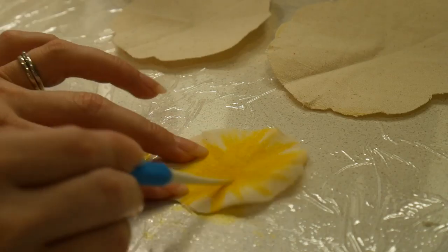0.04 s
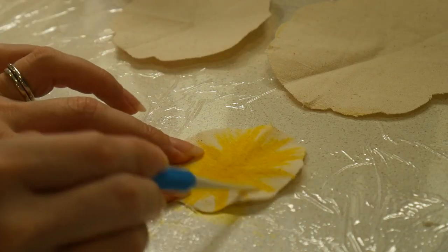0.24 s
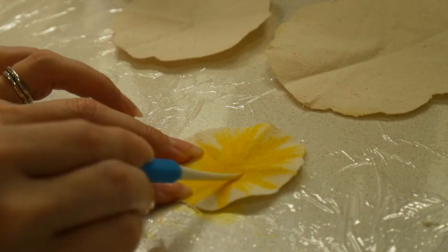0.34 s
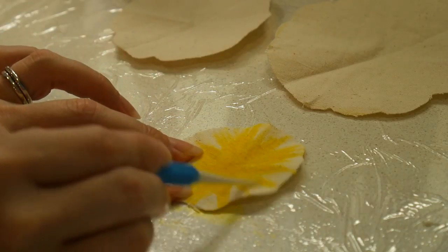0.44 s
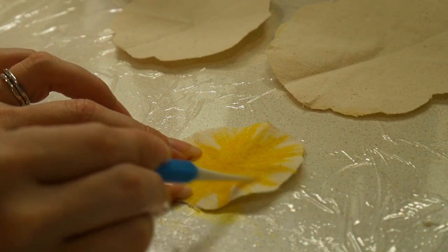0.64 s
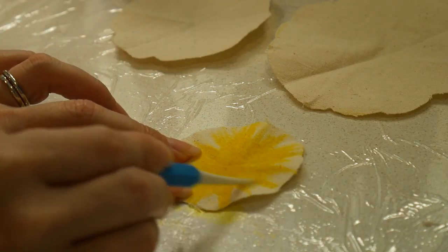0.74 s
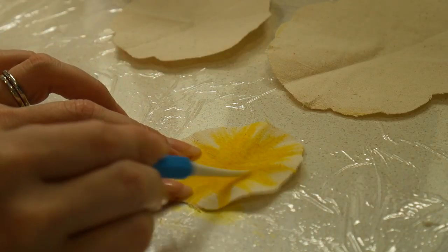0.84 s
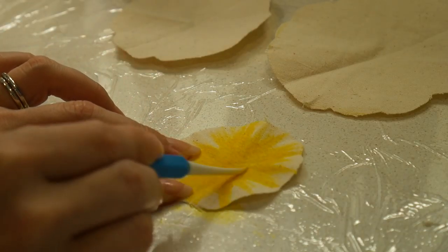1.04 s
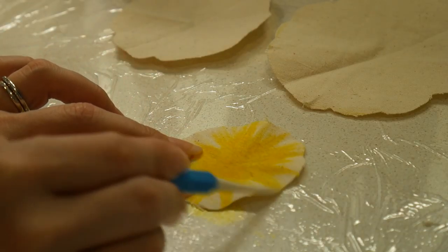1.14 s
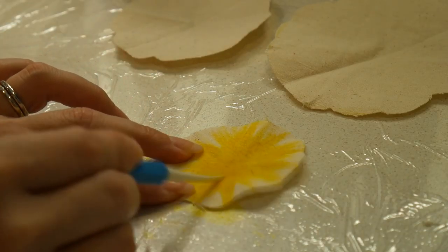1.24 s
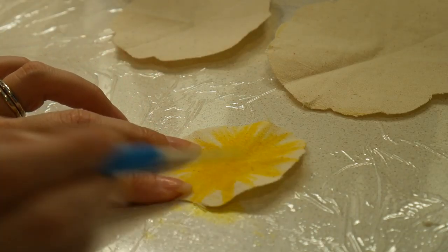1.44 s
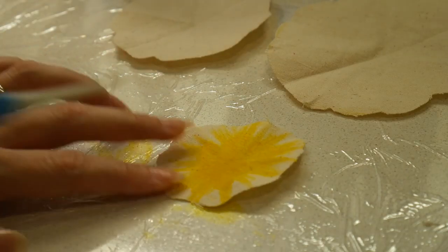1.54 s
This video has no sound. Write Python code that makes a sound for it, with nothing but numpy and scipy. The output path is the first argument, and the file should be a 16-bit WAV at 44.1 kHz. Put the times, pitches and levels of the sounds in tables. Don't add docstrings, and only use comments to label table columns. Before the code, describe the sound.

Short scratchy strokes of a small plastic tool on damp fabric, seven in an even rhythm, with clicky landings, faint film crackles and soft hand knocks, then a light tap; close stereo microphone in a quiet, humming room.

```python
import sys
import numpy as np
from scipy import signal
from scipy.fft import rfft, irfft
from scipy.io import wavfile
from scipy.ndimage import uniform_filter1d

SR = 44100
rng = np.random.default_rng(int(sys.argv[2]) if len(sys.argv) > 2 else 0)


def gain_from_db(level_db):
    decades = np.asarray(level_db, float) / 20
    return 10 ** decades


def dump_mix(stems):
    frames = np.atleast_2d(stems).T
    limited = np.clip(frames, -1, 1)
    pcm = np.round(limited * 32767).astype(np.int16)
    wavfile.write(sys.argv[1], SR, pcm)


N = 70560

CATCHES_S = [.2336, .4404, .6164, .8104, .9914, 1.1679, 1.3578]


def rms_one(x):
    return x / np.sqrt(np.mean(x ** 2) + 1e-20)


def resonance(x, hz, width_hz):
    r = np.exp(-np.pi * width_hz / SR)
    gain = (1 - r * r) / 2
    poles = [1, -2 * r * np.cos(2 * np.pi * hz / SR), r * r]
    return signal.lfilter([gain, 0, -gain], poles, x + 1e-18)


def drift(rate_hz):
    r = np.exp(-2 * np.pi * rate_hz / SR)
    settle = SR // 2
    slow = signal.lfilter([1], [1, -2 * r, r * r], rng.standard_normal(N + settle))[settle:]
    return slow / slow.std()


def burst(start_s, decay_s):
    t = np.arange(N) / SR - start_s
    return (t >= 0) * np.exp(-np.clip(t, 0, 1) / decay_s) * rng.standard_normal(N)


def bell(middle_s, half_width_s):
    t = np.arange(N) / SR
    return np.exp(-((t - middle_s) / half_width_s) ** 2)


def pair(mid, side, wider_db):
    # freq_hz, side_level_db
    pair_width = np.array([(100, -5), (400, -4), (1200, -12), (2600, -12), (4400, -17), (6500, -24),
                           (9000, -12), (13000, -7)])
    hz = np.fft.rfftfreq(N, 1 / SR) + 1
    side_db = wider_db + np.interp(np.log(hz), np.log(pair_width[:, 0]), pair_width[:, 1])
    side = irfft(rfft(side) * gain_from_db(side_db), N)
    return np.array([mid + side, mid - side])


def room_tone():
    # freq_hz, density_db_per_hz
    tone_spectrum = np.array([(30, -17), (110, -2.5), (170, 1.5), (650, -3.5), (1300, -4.5), (2400, -12.5),
                              (10000, -19), (15500, -15)])
    level_db, flicker_db, wider_db = -61, 2.5, 8.5
    edges_hz = 25 * 2 ** np.arange(0, 9.6, .5)
    white = rng.standard_normal((2, 2, N))
    out = 0
    for k, (low_hz, high_hz) in enumerate(zip(edges_hz, edges_hz[1:])):
        band_pass = signal.butter(2, [low_hz, high_hz], "band", fs=SR, output="sos")
        band = signal.sosfilt(band_pass, white[k % 2])
        middle = np.log(low_hz * high_hz) / 2
        band_db = np.interp(middle, np.log(tone_spectrum[:, 0]), tone_spectrum[:, 1])
        out = out + gain_from_db(band_db + flicker_db * drift(1.3)) * band
    mid, side = gain_from_db(level_db) * rms_one(out)
    return pair(mid, side, wider_db)


def bumps():
    # middle_s, level_db, half_width_s
    knocks = [(0.048, -66, 0.051), (0.142, -68.5, 0.026), (0.299, -61.5, 0.021), (0.461, -59, 0.025),
              (0.658, -58.5, 0.037), (0.838, -59.5, 0.031), (1.022, -60.5, 0.037), (1.192, -59.5, 0.022),
              (1.35, -67.5, 0.046)]
    thud_hz, knock_hz, knock_db = 152.8, 556, 7.5
    shape = sum(gain_from_db(db) * bell(s, half_s) for s, db, half_s in knocks)
    noise = rng.standard_normal((2, N))
    thud = resonance(resonance(noise, thud_hz, 45), thud_hz, 133)
    knock = resonance(resonance(noise, knock_hz, 470), knock_hz, 500)
    return shape * (rms_one(thud) + gain_from_db(knock_db) * rms_one(knock))


def ticks():
    # start_s, level_db, pitch_hz, width_hz, decay_s
    contacts = [
        (.0410, -58, 700, 700, .006),
        (.0550, -57, 1500, 1500, .003),
        (.1281, -45, 10500, 2500, .0015),
        (.1285, -52, 6800, 1200, .002),
        (.1357, -49, 10000, 2000, .0015),
        (1.1110, -55, 1300, 350, .005),
        (1.1155, -52, 1300, 350, .004),
        (1.5615, -60, 4800, 900, .002),
        (1.5620, -57, 3600, 300, .003),
        (1.5628, -48, 2200, 180, .003),
    ]
    out = 0
    for s, db, hz, width_hz, decay_s in contacts:
        out = out + gain_from_db(db) * np.sqrt(SR / width_hz) * resonance(burst(s, decay_s), hz, width_hz)
    return out


def pressure():
    # middle_s, level_db, half_width_s, brightness_db
    rubs = [(.046, -77, 0.006, -1), (0.063, -73, 0.011, 9), (0.288, -50, 0.014, 0.5),
            (0.42, -59, 0.0056, -12), (0.934, -52.5, 0.0061, -18), (1.117, -49.5, .010, -1),
            (1.347, -55, 0.018, -5.5)]
    # level_db, bite_share (0-1), swell_s, hold_s, brightness_db
    strokes = [
        (-32, .3, 0.0071, 0.016, -6.5),
        (-28.5, 0.89, 0.01, 0.019, -3.5),
        (-30.5, 0.7, 0.0018, 0.035, 0.5),
        (-29.5, 1, 0.013, 0.0073, -0.5),
        (-28, 0.98, .006, 0.011, 0),
        (-26.5, 0.66, 0.002, 0.014, 1.5),
        (-28.5, 0.3, 0.004, 0.012, -4.5),
    ]
    lift_db_per_s = 526
    t, low, high = np.arange(N) / SR, np.zeros(N), np.zeros(N)
    for s, db, half_s, bright_db in rubs:
        force = gain_from_db(db) * bell(s, half_s)
        low, high = low + force, high + force * gain_from_db(bright_db)
    for s, (db, bite, swell_s, hold_s, bright_db) in zip(CATCHES_S, strokes):
        rise = (t >= s) * np.clip(bite + (1 - bite) * (t - s) / swell_s, 0, 1)
        lifted_s = np.clip(t - s - swell_s - hold_s, 0, 1)
        force = rise * gain_from_db(db - lift_db_per_s * lifted_s)
        low, high = low + force, high + force * gain_from_db(bright_db)
    return low, high


def thread_drive():
    threads_per_s, spread_db, judder_db = 1100, 3.5, 1.0
    slip_share, bite_db = .55, 19
    sizes = gain_from_db(spread_db * np.minimum(rng.exponential(1, N), 3)) * rng.choice([-1, 1], N)
    snaps = rms_one(sizes * (rng.random(N) < threads_per_s / SR))
    drive = (snaps + slip_share * rng.standard_normal(N)) * gain_from_db(judder_db * drift(80))
    drive = drive / np.sqrt(uniform_filter1d(drive ** 2, size=400))
    drive[(np.array(CATCHES_S) * SR).astype(int) + 1] += gain_from_db(bite_db)
    return drive


def ring(force, modes):
    wander_db = 2.0
    out = 0
    for k, (hz, width_hz, db) in enumerate(modes):
        heard = force * gain_from_db(wander_db * drift(16.7))
        out = out + (-1) ** k * gain_from_db(db + 9.5) * resonance(heard, hz, width_hz)
    return out


def scratch():
    # start_s, level_db, brightness_db
    landings = [
        (.2280, -22.5, -13),
        (.4365, -20.5, -1),
        (0.6094, -28, -12),
        (.7945, -45.5, 8),
        (0.8017, -24, 5.5),
        (.9826, -22.5, 2),
    ]
    # freq_hz, width_hz, level_db
    body_modes = [(785, 114, -6.5), (1050, 200, -2.5), (1184, 160, 0.5), (1528, 228, 0.5), (2041, 73, 0.5),
                  (2304, 220, -2), (2786, 234, 0), (3110, 255, -9.5), (3523, 323, -4), (4470, 900, -8.5)]
    # freq_hz, width_hz, level_db
    tip_modes = [(6340, 334, 0), (7020, 630, -3.5), (8755, 500, -5.5), (9785, 520, -5), (11840, 1430, -10),
                 (15100, 550, -25)]
    drive = thread_drive()
    low, high = [force * drive for force in pressure()]
    for s, db, bright_db in landings:
        touch = gain_from_db(db) * np.abs(burst(s, .00012))
        low, high = low + touch, high + gain_from_db(bright_db) * touch
    low_cut = signal.butter(4, 650, "high", fs=SR, output="sos")
    return signal.sosfilt(low_cut, ring(low, body_modes)), ring(high, tip_modes)


def echoes(x, t60_s, onset_s):
    wall_cut_hz = 6900
    t = np.arange(int(.7 * SR)) / SR
    echo = rng.standard_normal((2, len(t)))
    dull = signal.sosfilt(signal.butter(1, wall_cut_hz, fs=SR, output="sos"), echo)
    bright = echo - dull
    echo = dull * gain_from_db(-60 * t / t60_s) + bright * gain_from_db(-90 * t / t60_s)
    echo = echo * np.clip(t / onset_s, 0, 1)
    return signal.fftconvolve(x[None], echo / np.sqrt(np.sum(echo ** 2) / 2), axes=1)[:, :N]


def moving_echo(x, t60_s, onset_s):
    turn_rad = 9 * np.arange(N) / SR
    one, other = echoes(x, t60_s, onset_s)
    return np.cos(turn_rad) * one + np.sin(turn_rad) * other


def lean(x, pan_db):
    return x * (gain_from_db([[pan_db], [-pan_db]]) - 1)


def scene():
    ring_db, room_db = -7, -13.5
    low, high = scratch()
    tool = low + high + ticks()
    tool = tool + gain_from_db(ring_db) * moving_echo(tool, .06, 0.0024)
    scatter = moving_echo(tool, .02, .001)
    near = pair(tool, scatter, 0) + lean(low, -.7) + lean(high, .3)
    room = pair(*echoes(tool, 0.44, 0.0027), 4.5)
    return near + gain_from_db(room_db) * room + room_tone() + bumps()


def band_limit(x):
    return signal.sosfilt(signal.butter(12, 16480, fs=SR, output="sos"), x)


def record(dry):
    x = dry - .75 * resonance(dry, 7900, 200)
    top_cut = signal.cheby2(10, 60, 16500, fs=SR, output="sos")
    return band_limit(signal.sosfilt(top_cut, x))


dry = scene()
out = record(dry)
dump_mix(out)
```